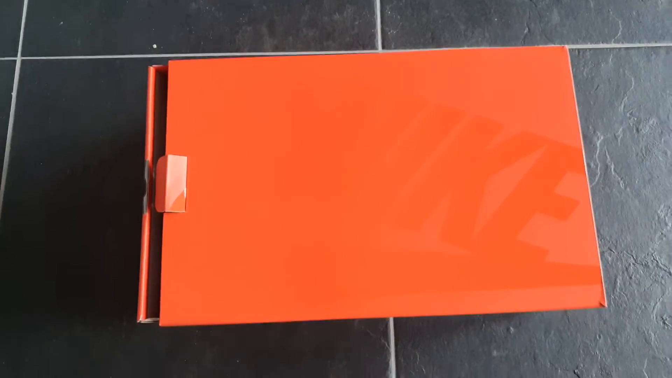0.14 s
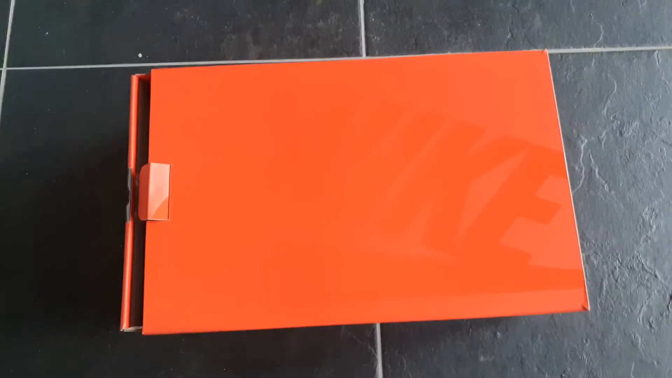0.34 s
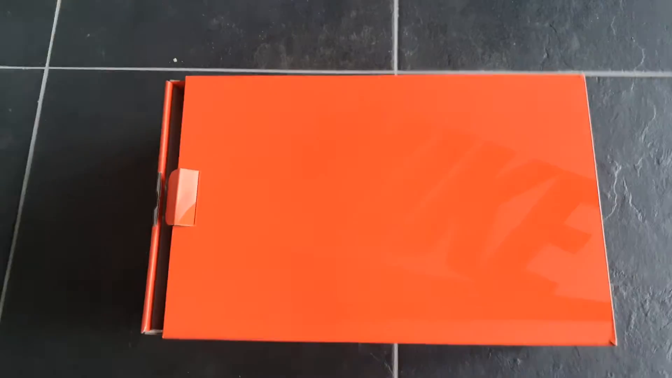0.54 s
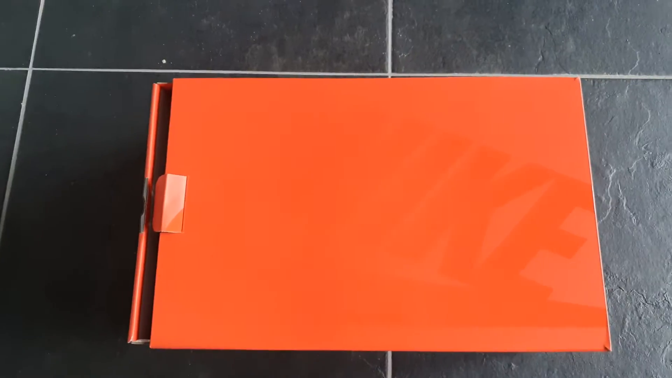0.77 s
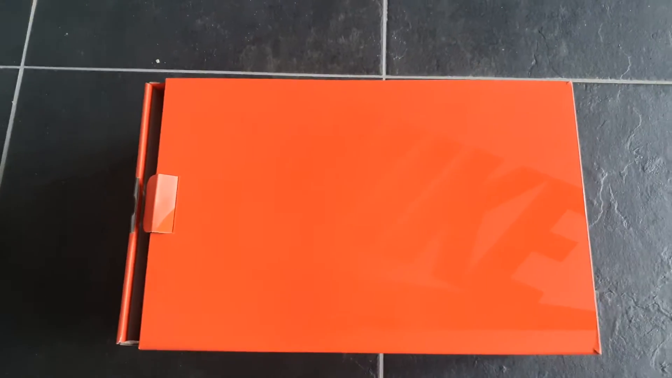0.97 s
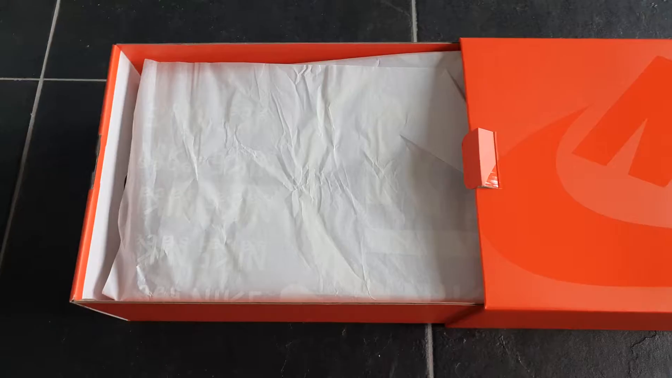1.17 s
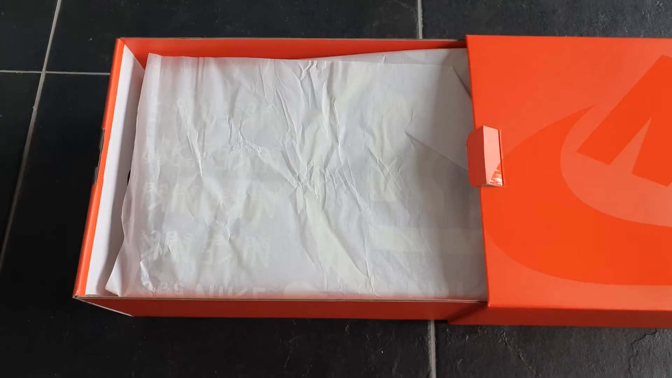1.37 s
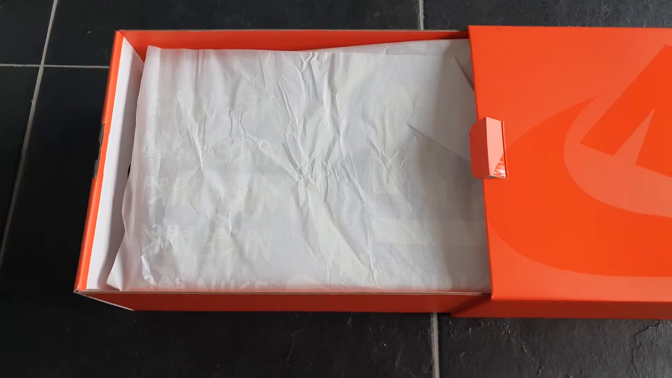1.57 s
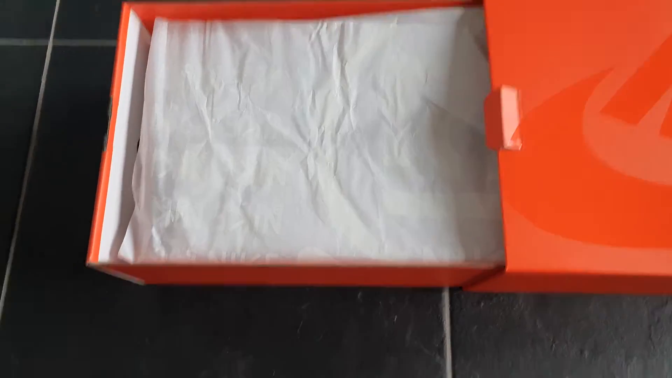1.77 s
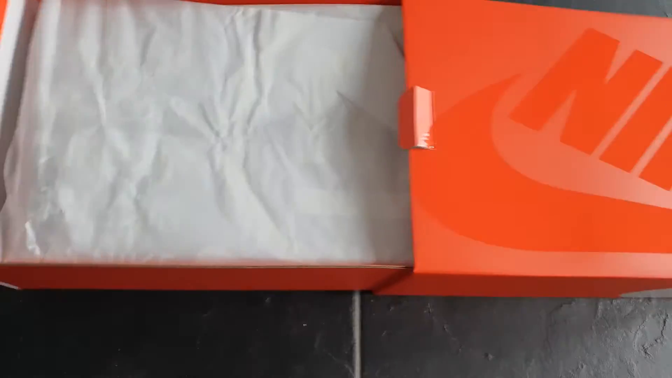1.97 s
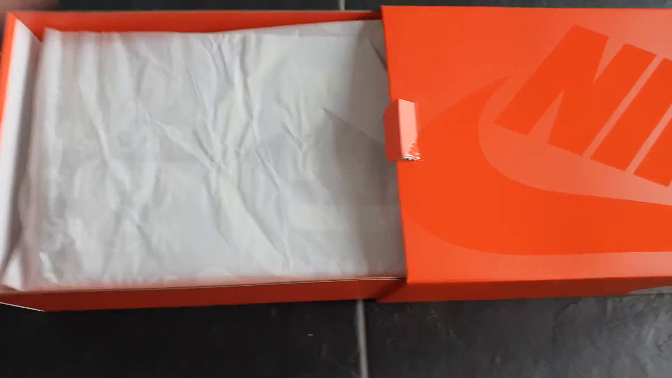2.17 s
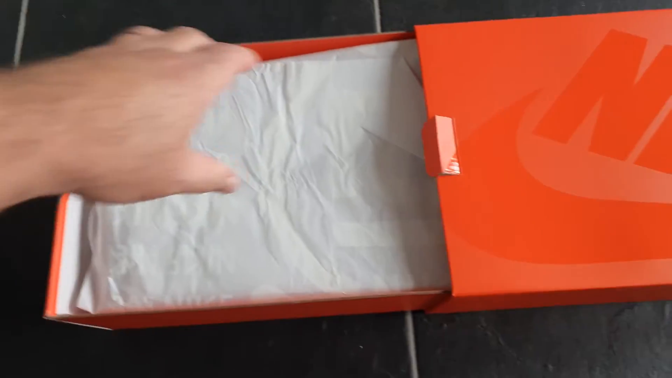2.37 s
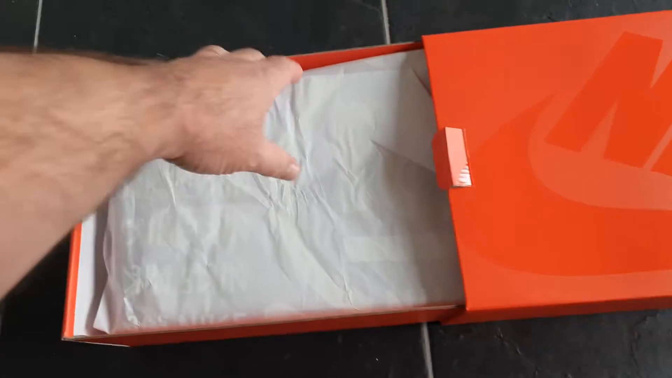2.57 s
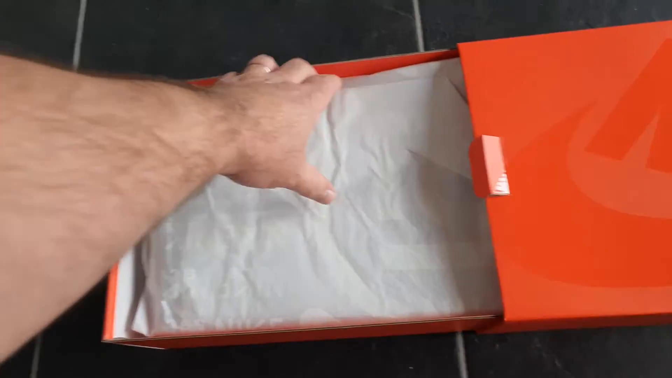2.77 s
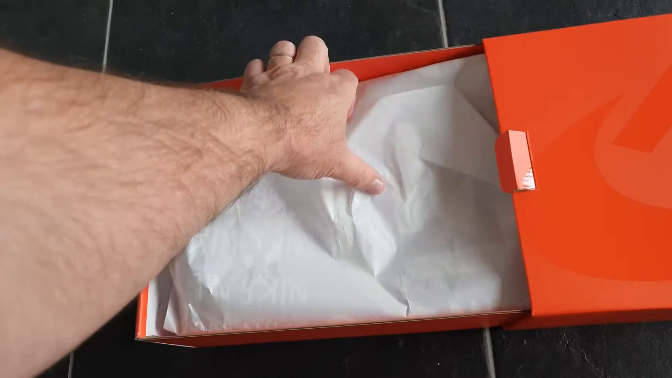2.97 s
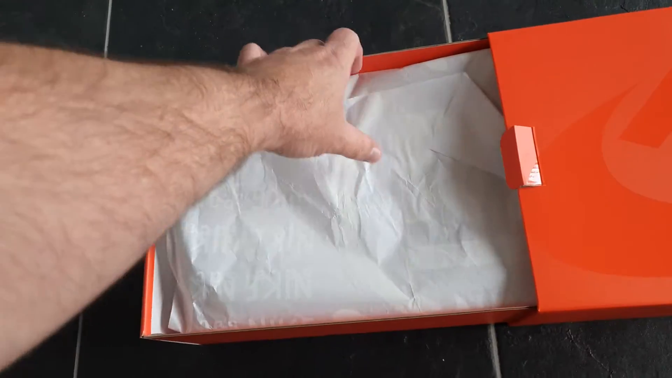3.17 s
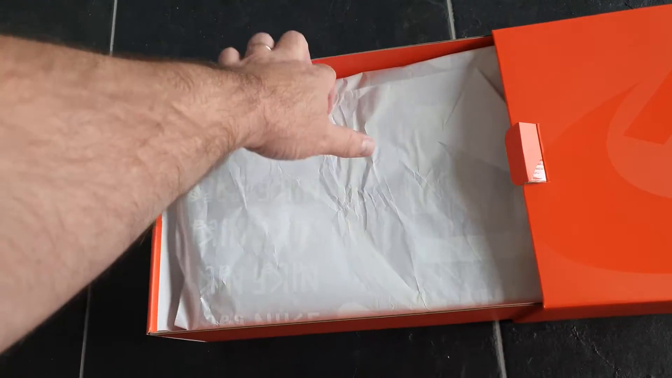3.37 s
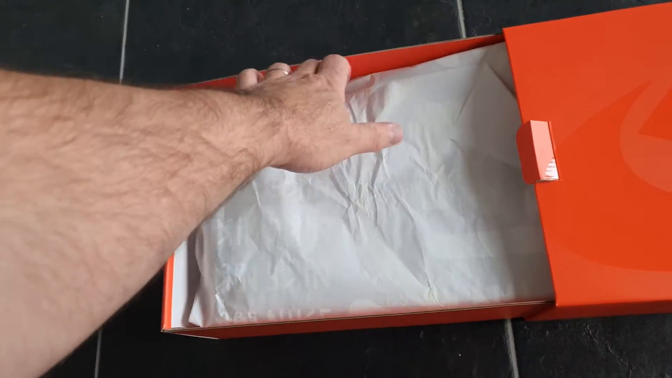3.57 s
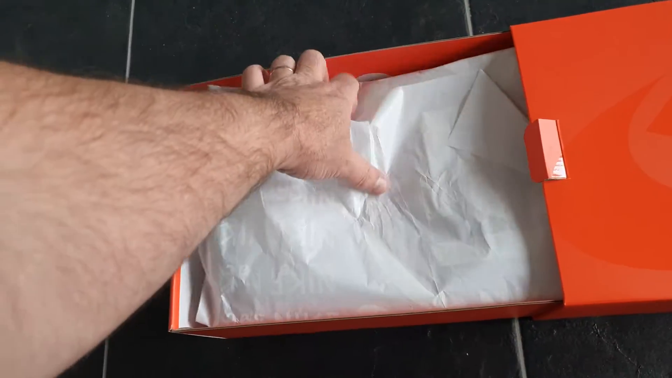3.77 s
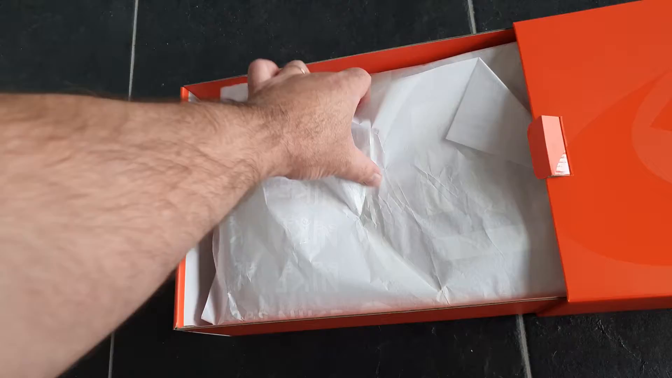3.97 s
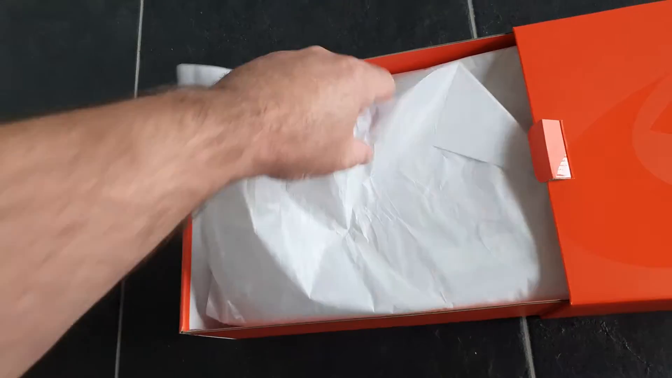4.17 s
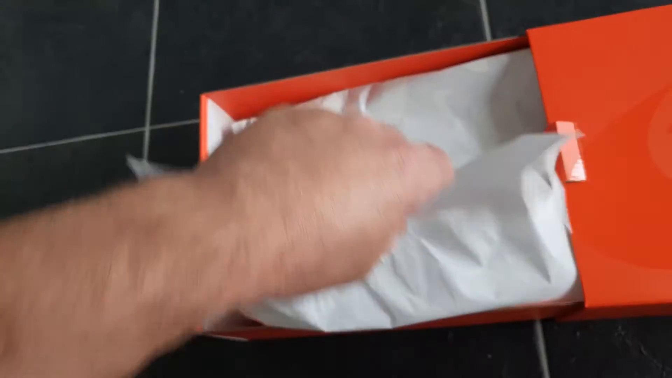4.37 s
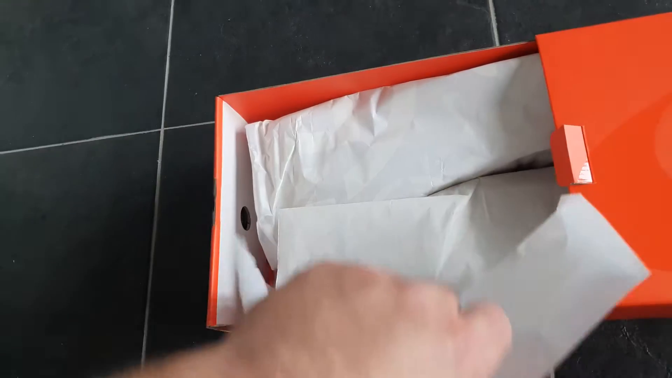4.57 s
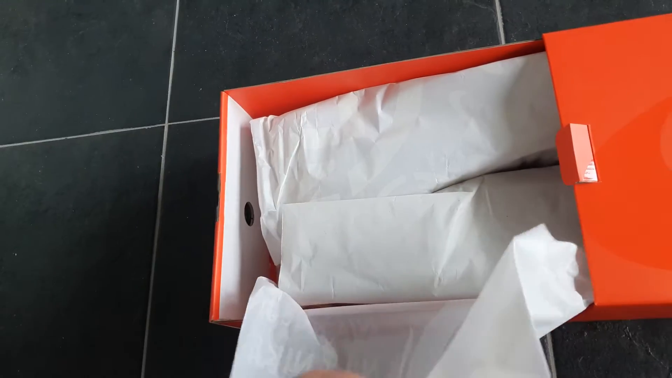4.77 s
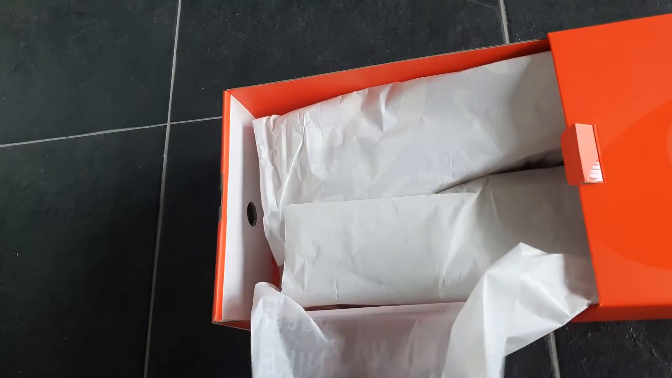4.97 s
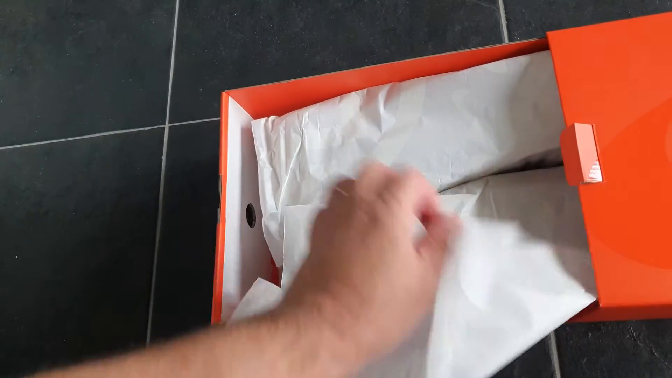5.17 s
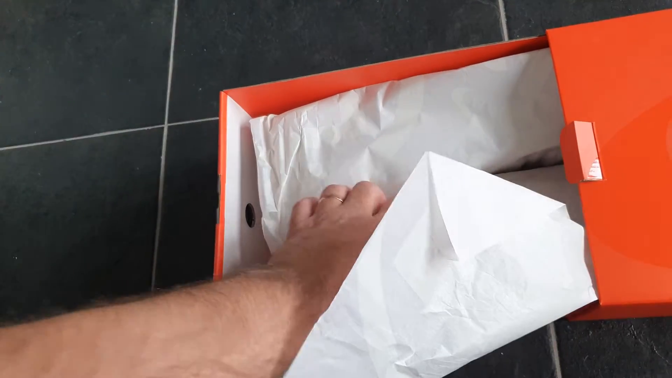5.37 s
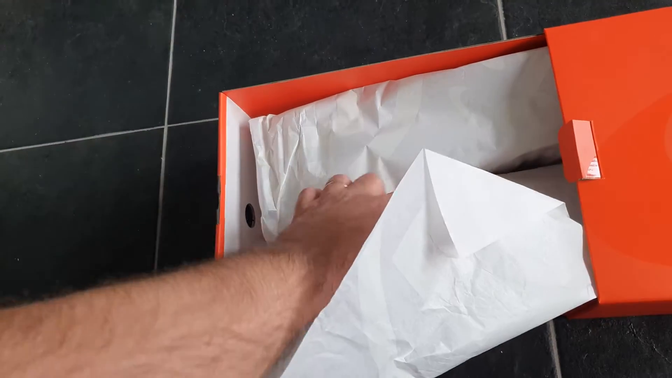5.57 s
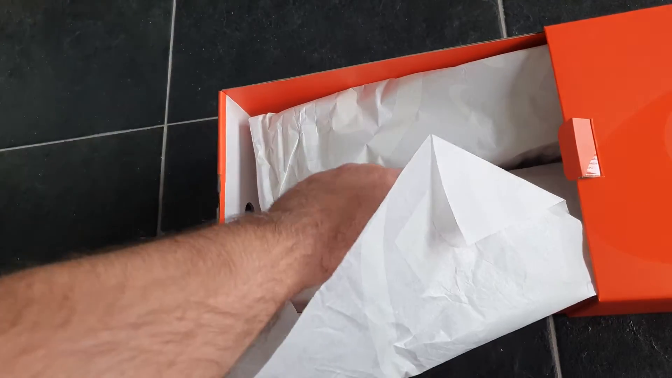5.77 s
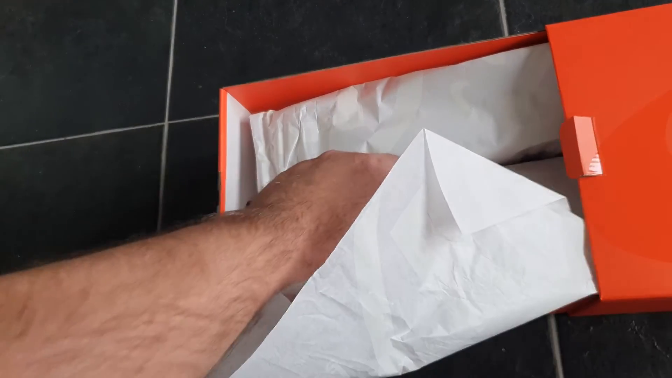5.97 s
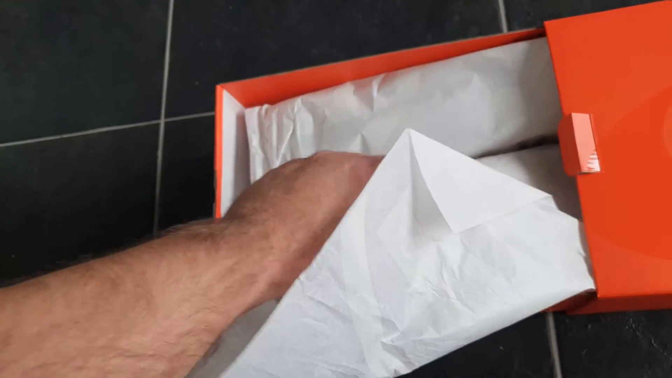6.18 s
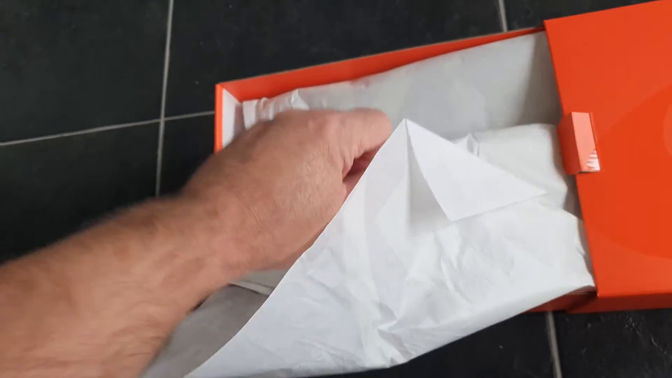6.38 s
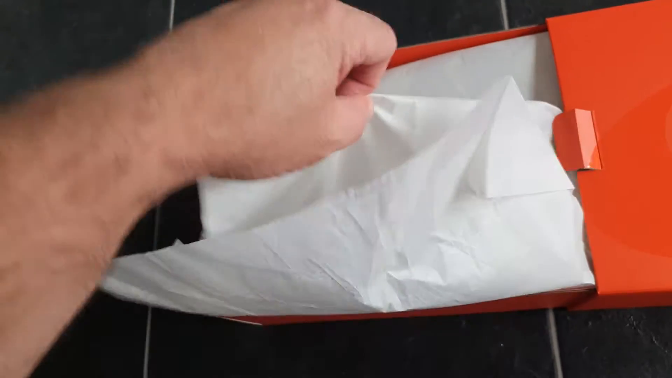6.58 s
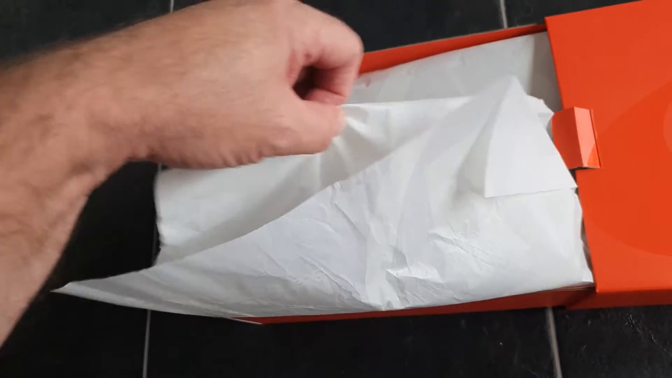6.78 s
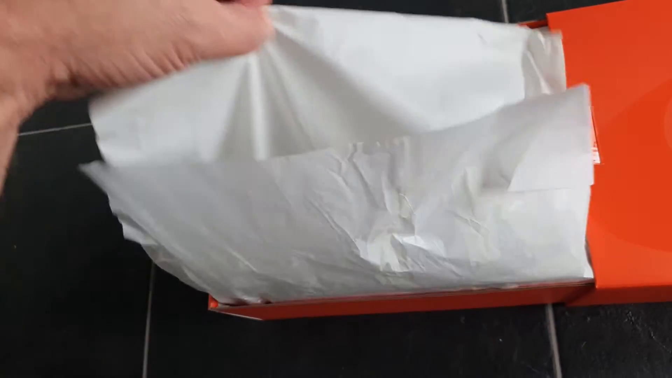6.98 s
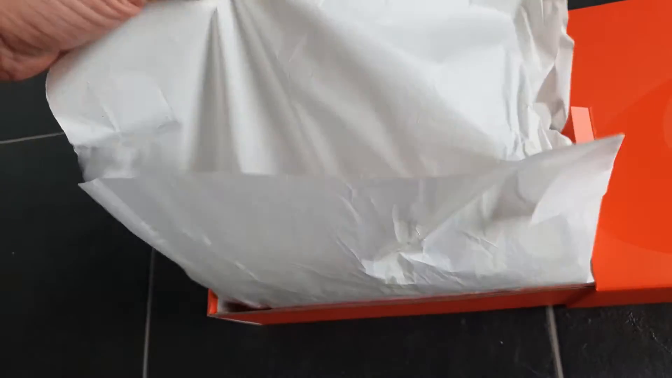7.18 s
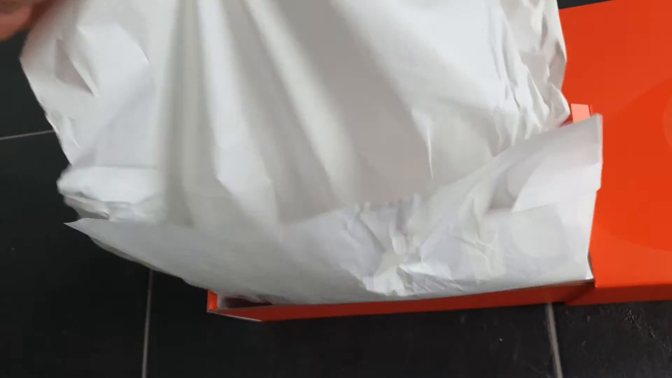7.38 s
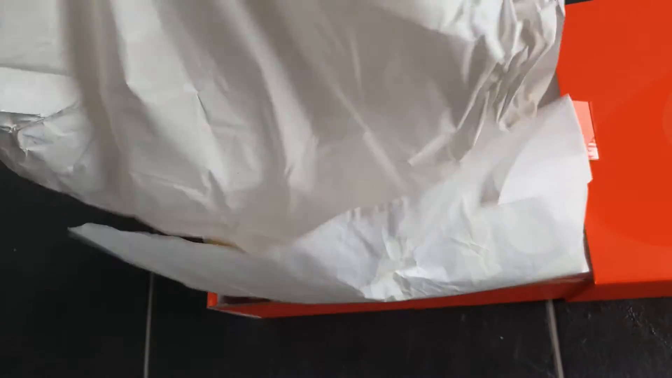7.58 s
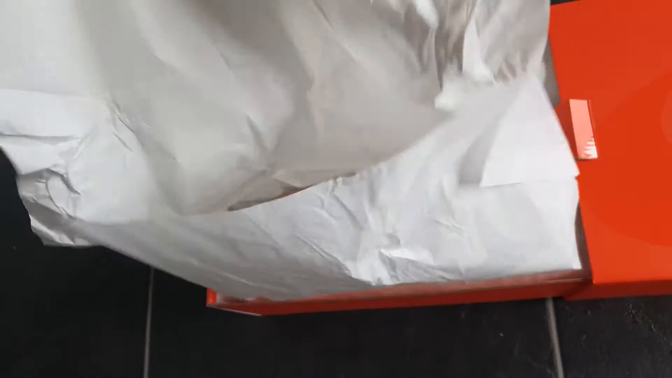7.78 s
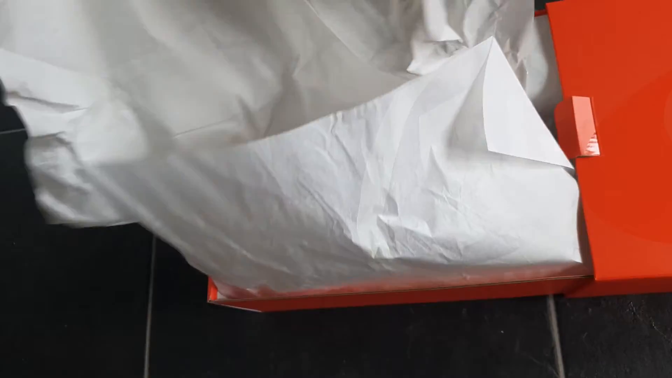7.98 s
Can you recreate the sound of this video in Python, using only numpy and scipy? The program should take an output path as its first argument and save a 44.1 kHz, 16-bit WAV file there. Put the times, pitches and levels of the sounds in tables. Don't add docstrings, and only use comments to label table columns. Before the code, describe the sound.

Close up, light taps and rubs give way to crinkling tissue paper, sharp crease snaps and dull cardboard knocks, hardest near the end.

```python
import sys
import numpy as np
from scipy import signal
from scipy.io import wavfile
from scipy.ndimage import uniform_filter1d

SR = 44100
rng = np.random.default_rng(int(sys.argv[2]) if len(sys.argv) > 2 else 0)


def how_loud(loudness_db):
    steps = np.asarray(loudness_db, float) / 20
    return 10 ** steps


def master(y):
    cut = np.clip(np.atleast_2d(y).T, -1, 1)
    pcm = np.round(cut * 32767)
    wavfile.write(sys.argv[1], SR, pcm.astype(np.int16))


N = 354563
T = np.arange(N) / SR

# [f/Hz, density/dB per Hz]
AIR_SPECTRUM = [(88, -34), (150, -5), (249, -11), (439, 0), (774, -6), (1980, -18), (5460, -37),
                (6770, -4.5), (16000, -60)]
AIR_DB = -82.5
# [f/Hz, t60/s]
ROOM_DECAY = [(200, 0.13), (1000, 0.59), (4000, 0.12), (12000, 0.12)]
# [f/Hz, left-right level/dB]
PORT_SHADE = [(60, -29), (180, 18.5), (550, -0.5), (1650, -4.5), (4970, -0.5), (15000, 0.5)]

# [peak t/s, level/dB, time to rise 10 dB/s, time to fall 10 dB/s]
SLEEVE_SWEEPS = [
    (0.0, -80.5, .1, 1.5),
    (0.58, -69, -0.21, -0.59),
    (1.68, -78, -0.25, 3.5),
    (2.08, -60.5, 0.09, 0.43),
    (2.3, -61.5, 0.06, 0.07),
]
# [f/Hz, density/dB per Hz]
CLOTH_SPECTRUM = [(120, -45), (200, 3), (399, 12), (496, 8), (841, 10.5), (1140, 4), (1900, -1.5),
                  (2840, -14), (3660, -9.5), (8450, -21), (15400, -22)]
SLEEVE_LOW_DB, SLEEVE_END_S = -0.5, 2.75

# [peak t/s, level/dB, time to rise 10 dB/s, time to fall 10 dB/s]
GRIP_JOLTS = [(0.0, -76, .1, 1), (0.51, -42.5, 0.09, 0.04), (0.91, -56, -0.02, -0.1),
              (1.08, -53.5, 0.16, 0.08), (1.36, -65, 0.04, 0.3), (1.78, -49.5, -0.12, 0.35),
              (2.0, -43, 0.05, 0.08), (2.36, -59.5, -0.1, 0.05), (2.76, -54, -0.03, 1.2),
              (2.89, -42.5, -0.03, -0.34), (3.227, -40, 0, 0.2), (3.52, -44.5, 0, 0.7),
              (4.41, -39.5, -0.13, 0.24), (5.43, -41, -0.04, -0.15), (6.6, -30.5, -0.22, 0.1),
              (6.9, -36, -0.34, 0.25), (7.33, -40.5, -0.26, 0.2), (7.63, -27.5, -0.23, 0.13),
              (7.76, -37, 0.14, -0.2)]
# [f/Hz, density/dB per Hz]
SWAY_SPECTRUM = [(15, -28), (25, 2), (59, 1), (97, 0), (124, -6), (220, -8.5), (290, -16), (480, -120)]
# [f/Hz, density/dB per Hz]
WORK_SPECTRUM = [(15, -16), (25, -19.5), (92, -4), (135, -10.5), (220, -10), (290, -64), (480, -120)]
SHAKE_DB, SHAKE_SLOPE, STILL_DB = -45, 0.86, -89

# [start t/s, length/s, peak level/dB, left-right level/dB, swell/dB]
FINGER_SLIPS = [
    (0.414, 0.13, -63.5, -39, 5),
    (0.523, 0.04, -53, 49, 10),
    (0.88, 0.082, -52, -27, 18),
    (0.966, 0.044, -74, -16, 5),
    (1.039, 0.041, -59, 11, 8.5),
    (1.14, 0.053, -68.5, 19, -7),
    (1.727, 0.21, -59, -24, 8),
    (1.909, 0.13, -40.5, -49, 13.5),
]
# [f/Hz, density/dB per Hz]
SKIN_SPECTRUM = [(180, -26), (300, -2), (619, 0.5), (1510, -5), (1660, -3.5), (2310, -12.5), (3490, -11),
                 (5640, -18), (6760, -18.5), (15400, -27)]
SLIP_PEAK = 0.55
SLIP_TREBLE_DB, TREBLE_PER_PAN = -2.5, 0.24
# [t/s, peak level/dB, ring f/Hz, treble level/dB, left-right level/dB]
FINGER_TICKS = [(0.39, -60, 558, -13, -16), (0.4162, -38.5, 2900, -24, -25), (0.4178, -47, 300, -30, -20),
                (0.4878, -29.5, 700, -9, -22.5), (0.51, -24.5, 840, -30, -24), (0.5242, -34, 527, -8.5, 14),
                (0.888, -51, 786, -5, -29.5), (1.037, -34, 3500, -7, 27), (1.141, -45.5, 3000, -13, 21),
                (1.738, -48, 526, -12, -21), (2.0712, -37, 725, -27, -22), (2.088, -39, 791, -14, -21.5),
                (2.105, -40.5, 830, -19, -20), (2.18, -48, 859, -12, -12), (2.271, -42, 890, -16, -6),
                (2.351, -46, 1030, -14, -17), (2.368, -47, 1100, -14, -16), (2.386, -45, 1500, -13, -14),
                (2.411, -48, 1200, -16, -12), (2.437, -47, 1280, -17, -16), (2.454, -49, 775, -20, -18)]

# [f/Hz, level/dB, t60/s]
BOX_MODES = [(193, -3, 0.011), (230, -25, 0.12), (277, 4, 0.19), (341, 2.5, 0.2), (407.4, 3, 0.18),
             (559.5, -3, 0.086), (825, 6, 0.0092)]
# [t/s, ring level/dB, freedom of the walls as a factor on t60, thud level/dB]
BOX_KNOCKS = [(2.884, -29.5, 0.67, -24), (3.2227, -17, 1.16, -10.5), (3.504, -27, 0.56, -34),
              (3.625, -28, 0.56, -21.5), (3.731, -26, 0.85, -30), (4.584, -22, 1.4, -36.5),
              (4.698, -23, 1.4, -33), (4.771, -25.5, 1.1, -28), (4.932, -24, 1.1, -38),
              (5.292, -32, 0.43, -40), (5.409, -16.5, 0.64, -24.5), (6.561, -20, 1, -36),
              (7.617, -14, 0.84, -17), (7.701, -5.5, 0.21, -16), (7.733, -3, 0.82, -11),
              (7.762, -16, 0.98, -41), (7.778, -12, 0.62, -28), (7.839, -24, 1.1, -38),
              (7.926, -30, 0.92, -42)]
PUSH_DB, PUSH_SLOPE, PUSH_S = -39, 0.66, 0.017

# [peak t/s, effort level/dB, time to rise 10 dB/s, time to fall 10 dB/s]
HAND_TUGS = [(2.729, -44, 0.26, 0.35), (2.956, -25.5, 0.0262, 0.03), (3.005, -31, 0.08, 0.23),
             (3.059, -28, 0, 0.09), (3.103, -25.5, 0, 0.03), (3.181, -32, 0.1, -0.07),
             (3.349, -27.0, 0.05, -0.04), (3.514, -28, 0, -0.07), (3.729, -21, 0.0162, 0.04),
             (3.871, -28, 0.08, -0.2), (4.0, -31.5, 0.57, -1.2), (4.05, -30.5, 0.27, 0.021),
             (4.14, -32, 0.16, 0.1), (4.186, -28, 0.08, 0.15), (4.259, -24.0, -0.03, 0.04),
             (4.305, -25.5, -0.02, 0.045), (4.365, -24, -0.02, 0.16), (4.447, -23.5, -0.05, 0.06),
             (4.545, -26, 0.03, 0.023), (4.587, -26, -0.1, 0.1), (4.78, -20.0, 0.0852, 0.07),
             (4.877, -29.5, -0.11, 0.09), (5.005, -24.5, 0.06, 0.07), (5.062, -28, -0.2, -0.07),
             (5.1, -28.0, -0.17, 0.09), (5.196, -32.5, -1.1, 0.2), (5.244, -35.5, -0.02, 0.1),
             (5.304, -31, 0, 0.06), (5.413, -23, -0.03, 0.02), (5.481, -30.0, -0.02, 0.16),
             (5.621, -33, 0.12, 0.2), (5.677, -36, -0.04, 0.164), (5.804, -30, -0.09, 0.07),
             (5.877, -33.5, -0.07, 0), (5.912, -31, -0.02, -0.17), (6.062, -26.5, 0.03, 0.02),
             (6.127, -32.0, 0.22, 0.4), (6.29, -23, 0.0248, 0.07), (6.416, -25, 0.17, 0.076),
             (6.574, -18, 0.1147, 0.18), (6.894, -23, 0, 0.49), (7.22, -23, 0.08, 0.043),
             (7.381, -27, -0.12, 0.08), (7.563, -23.5, 0.1, 0.07), (7.622, -22, 0.01, 0.1),
             (7.724, -24, 0.17, 0.09), (8.016, -35, 0.14, 3)]
FULL_DB = -20
# [t/s, grain (1 crumpling, 0 one sheet sliding free)]
PAPER_GRAIN = [
    (2.64, 0.89),
    (4.6, 0.64),
    (6.2, 0.9),
    (6.4, 0.32),
    (7.3, 0.35),
    (7.5, 0.24),
    (8.04, 0.64),
]
PAPER_START_S = PAPER_GRAIN[0][0]
# [f/Hz, density/dB per Hz]
PAPER_SPECTRUM = [(290, -56.5), (500, 0.5), (647, -4), (1150, -1.5), (1670, 0.5), (2010, -0.5), (3230, 2),
                  (6900, -7.5), (7960, -14.5), (10500, -11.5), (15400, -17)]
SHEEN_DB, SHEEN_SLOPE = -29, 1.226

# [t/s, peak level/dB, ring f/Hz, treble level/dB]
CREASE_CRACKS = [(2.6847, -36, 1180, -19), (2.7382, -30, 1100, -8), (2.8745, -17, 4600, -18),
                 (2.9025, -13, 3730, -12.5), (3.0632, -10.5, 3780, -9), (3.5254, -22, 3930, -5),
                 (3.8104, -3, 3540, -24), (3.8582, -5.5, 3170, -11), (3.976, -20, 2420, -9),
                 (4.299, -14.5, 2340, -21), (4.311, -12.5, 1440, -14), (5.0516, -12.5, 4500, -10),
                 (5.301, -15, 3860, -22), (5.32, -23, 3050, -25), (5.394, -14, 1860, -18),
                 (5.5634, -22, 1220, -25), (5.6136, -21, 1860, -12), (5.691, -17, 4470, -12.5),
                 (6.072, -9, 3090, -24), (6.2923, -14, 2050, -10)]
# [t/s, peak level/dB, ring f/Hz, treble level/dB]
CREASE_SNAPS = [(2.7798, -23.5, 3250, -19), (3.0548, -19.5, 3740, -9.5), (3.0856, -10, 4850, -20),
                (3.1088, -6.5, 3180, -14.5), (3.396, -17, 2800, -17), (3.5004, -27, 1162, -12),
                (3.546, -9.5, 2240, -20), (3.616, -28, 1690, -9.5), (3.7422, -10.5, 3830, -11),
                (4.1003, -17, 3980, -25.5), (4.137, -8, 3800, -16.5), (4.175, -11, 2800, -35),
                (4.445, -17, 1160, -15), (4.513, -20, 6060, -10), (4.5304, -11, 3170, -20),
                (4.587, -8.5, 1900, -17), (4.773, -8, 1710, -14), (4.871, -10, 1840, -20),
                (4.9606, -9.5, 4190, -17), (4.994, -12.5, 1750, -11), (5.3815, -16, 1700, -16),
                (5.4145, -12, 3800, -17), (5.8, -13.5, 1670, -26.5), (5.8736, -18, 1230, -21.5),
                (6.129, -17, 3440, -17.5), (6.263, -10, 4430, -15), (7.2157, -19.5, 1360, -22),
                (7.923, -22.5, 3450, -15)]
# [t/s, peak level/dB, ring f/Hz, treble level/dB]
FOLD_CRUNCHES = [(3.318, -24, 3430, -11), (3.7143, -11, 2340, -22), (3.9523, -17, 1670, -28),
                 (4.2492, -12, 1700, -23), (4.361, -11.5, 4600, -16), (4.67, -16, 1730, -13),
                 (4.7395, -9.5, 1720, -13.5), (5.0987, -16, 3980, -15), (5.481, -23.5, 2020, -24),
                 (5.6536, -25, 3430, -14), (6.0427, -16, 3380, -25), (6.3876, -15, 1580, -25),
                 (7.376, -19.5, 1170, -7), (7.618, -9.5, 3400, -24), (7.65, -13, 3300, -26),
                 (7.74, -13, 3270, -21.5), (7.765, -20, 3270, -22)]
# [t/s, peak level/dB, ring f/Hz, treble level/dB]
PLEAT_FLIPS = [(2.7097, -44, 1210, -25), (2.7312, -29, 1100, -22), (2.94, -21, 1700, -24),
               (2.954, -21, 4420, -24), (2.9952, -25, 1190, -22), (3.0226, -20.5, 3150, -13),
               (3.3622, -15.5, 1640, -23), (3.4914, -31, 2060, -19), (3.5099, -24, 993, -17),
               (3.5164, -15, 1170, -24), (3.5584, -23, 2490, -15), (3.6436, -32, 930, -24),
               (3.7317, -14, 1210, -23), (3.8697, -24, 3170, -28), (3.8897, -23, 3210, -11),
               (3.9943, -17, 2500, -15), (4.044, -18, 1230, -22), (4.0582, -20, 3270, -30),
               (4.1124, -16.5, 3770, -17), (4.1902, -15, 3110, -17), (4.2258, -19, 1210, -17),
               (4.341, -17, 947, -15), (4.369, -20, 1390, -8), (4.3996, -15.5, 1610, -13),
               (4.4138, -15, 3400, -17), (4.4863, -19, 1000, -10), (4.576, -18, 1860, -13),
               (4.6974, -16, 1760, -13), (4.797, -23, 1870, -19), (4.8122, -21, 1700, -21),
               (4.9332, -15, 2200, -18), (5.066, -17.5, 4080, -15), (5.238, -13, 4000, -23),
               (5.2755, -20, 3770, -25), (5.7435, -23.5, 1410, -17), (5.784, -26, 1640, -24),
               (5.841, -25, 1660, -16), (5.9044, -26, 1220, -19), (6.181, -17, 3330, -24),
               (6.2015, -20.5, 2880, -16), (6.223, -27.5, 1360, -21), (6.9002, -19, 1190, -13),
               (7.3834, -20, 1120, -23), (7.4402, -18, 1360, -13), (7.695, -20, 3240, -8),
               (7.7274, -13.5, 3240, -14), (7.7854, -32, 1220, -9), (7.8444, -29, 1020, -9),
               (8.01, -21, 3230, -22), (8.0324, -17.5, 3050, -14)]
CRACK_MS, SNAP_MS, CRUNCH_MS, PLEAT_MS = 0.76, 2.77, 7, 2.33


def evened(x):
    return x / np.sqrt(np.mean(x ** 2) + 1e-20)


def read(points, hz):
    f, value = np.transpose(points)
    return np.interp(np.log(hz + 1), np.log(f + 1), value)


def colour(x, points):
    gain_db = read(points, abs(np.fft.fftfreq(8192, 1 / SR)))
    log_gain = np.log(how_loud(np.maximum(gain_db, -100)))
    taps = np.fft.ifft(np.exp(np.conj(signal.hilbert(log_gain)))).real[:4096]
    return signal.oaconvolve(x, taps[None], axes=1)[:, :N]


def split(x, hz):
    low = signal.sosfilt(signal.butter(4, hz, "low", fs=SR, output="sos"), x)
    high = signal.sosfilt(signal.butter(4, hz, "high", fs=SR, output="sos"), x)
    return low, high


def flutter(seconds):
    size = max(int(seconds * SR), 2)
    return evened(uniform_filter1d(uniform_filter1d(rng.standard_normal(N), size), size))


def swells(rows, floor_db):
    s, db, rise, fall = np.transpose(rows)[:, :, None]
    t = T[::64]
    before = (s - t) / np.maximum(rise, .012)
    after = (t - s) / np.maximum(fall, .02)
    drop = np.where(t < s, before, after)
    power = (how_loud(db - 10 * drop) ** 2).sum(0) + how_loud(floor_db) ** 2
    return np.interp(T, t, 10 * np.log10(power))


def panned(pan_db):
    sides = how_loud(np.multiply.outer([.5, -.5], np.clip(pan_db, -30, 30)))
    return 2 * sides / sides.sum(0)


def add(mix, s, sound):
    part = mix[:, round(s * SR):][:, :sound.shape[1]]
    part += sound[:, :part.shape[1]]


def quiet_air():
    return how_loud(AIR_DB) * evened(colour(rng.standard_normal((2, N)), AIR_SPECTRUM))


def room(x):
    taps = np.zeros((2, SR // 2))
    slots = np.arange(160, SR // 2 - 20, 20)
    at = slots + rng.integers(0, 20, (2, len(slots)))
    np.put_along_axis(taps, at, rng.choice([-1., 1.], at.shape), 1)
    hz, t, z = signal.stft(taps, SR, nperseg=256)
    decay = how_loud(-60 * t / read(ROOM_DECAY, hz)[:, None])
    tail = signal.istft(z * decay, SR, nperseg=256)[1]
    return signal.fftconvolve(x, tail / np.linalg.norm(tail[0]), axes=1)[:, :N]


def shaded(x):
    low, high = split(x, 1010)
    both = high + 0.44 * low.mean(0) + 0.52 * low
    left = colour(both[:1], [(hz, db / 2) for hz, db in PORT_SHADE])
    right = colour(both[1:], [(hz, -db / 2) for hz, db in PORT_SHADE])
    return np.vstack([left, right])


def sleeve():
    fade = np.clip((SLEEVE_END_S - T) / 0.018, 0, 1)
    fibres = rng.standard_normal((2, N)) * how_loud(0.27 * flutter(0.0083))
    low, high = split(colour(fibres, CLOTH_SPECTRUM), 2510)
    cloth = how_loud(10.5) * evened(high) + how_loud(SLEEVE_LOW_DB) * evened(low)
    return fade * how_loud(swells(SLEEVE_SWEEPS, floor_db=-100)) * cloth


def grip(effort_db):
    noise = rng.standard_normal((3, N)) * how_loud(2.6 * flutter(.02))
    lumps = noise[2] + .36 * noise[:2]
    work = np.clip(T - 1.9, 0, 1)
    rumble = work * evened(colour(lumps, WORK_SPECTRUM))
    rumble += (1 - work) * evened(colour(lumps, SWAY_SPECTRUM))
    pulling = np.clip((T - PAPER_START_S) / .1, 0, 1)
    shake = how_loud(SHAKE_DB + SHAKE_SLOPE * (effort_db - FULL_DB)) * pulling
    return np.hypot(how_loud(swells(GRIP_JOLTS, STILL_DB)), shake) * rumble * how_loud([[-.8], [.8]])


def slips():
    drag = rng.standard_normal((2, N)) * how_loud(2.0 * flutter(0.0006))
    body, treble = split(colour(drag, SKIN_SPECTRUM), 3450)
    body, treble = evened(body), evened(treble)
    out = np.zeros((2, N))
    for start, length, peak_db, pan_db, swell_db in FINGER_SLIPS:
        from_peak = np.interp((T - start) / length, [0, SLIP_PEAK, 1], [1, 0, 1])
        level_db = peak_db - swell_db * from_peak
        onset, release = (T - start) / 0.0011, (start + length - T) / 0.006 + .6
        on = np.clip(np.minimum(onset, release), 0, 1)
        bright = how_loud(SLIP_TREBLE_DB + TREBLE_PER_PAN * pan_db)
        out += on * how_loud(level_db + 1.5) * panned(pan_db)[:, None] * (body + bright * treble)
    return out


def ticks(cycles=0.86, lag=3.5, crack=0.49):
    out, t = np.zeros((2, N)), np.arange(600) / SR
    for s, peak_db, hz, treble_db, pan_db in FINGER_TICKS:
        noise = rng.standard_normal((3, len(t)))
        ring = np.sin(2 * np.pi * hz * t) * np.exp(-t * hz / cycles)
        ring += crack * uniform_filter1d(noise[2], 9) * np.exp(-t / 0.0022)
        hiss = evened(np.diff(noise[:2], 2, prepend=0, append=0))
        puff = 0.79 * how_loud(treble_db) * hiss * np.exp(-t / 0.001)
        sound = how_loud(peak_db + 1.5) * panned(pan_db)[:, None] * (ring + puff)
        sound[0] = np.roll(sound[0], round(lag * rng.uniform(-0.63, 1)))
        add(out, s, sound)
    return out


def box(push, held):
    t = np.arange(SR // 2) / SR
    ring = np.zeros(len(t))
    for k, (hz, db, t60) in enumerate(BOX_MODES):
        ring += (-1) ** k * how_loud(db - 60 * t / (held * t60)) * np.sin(2 * np.pi * hz * t)
    return split(signal.oaconvolve(push, ring)[:N], 124)[1]


def shaken(push):
    t = np.arange(SR // 3) / SR
    rattle = how_loud(-36.0) * rng.standard_normal(len(t)) * np.exp(-t / 0.094)
    return np.convolve(push, rattle + (t == 0))


def knocks():
    out, push = np.zeros((1, N)), signal.windows.hann(30)
    t = np.arange(SR // 20) / SR
    thud = np.sin(2 * np.pi * 215 * t) * np.exp(-t / 0.0034)
    thud += 0.4 * np.sin(2 * np.pi * 950 * t) * np.exp(-t / 0.0034)
    for s, peak_db, freedom, thud_db in BOX_KNOCKS:
        add(out, s, how_loud(peak_db - 36.0) * box(shaken(push), np.clip(freedom, .2, 2))[None])
        add(out, s + 0.00196, how_loud(thud_db) * thud[None])
    return out[0]


def tiny_creases():
    size = how_loud(3.2 * np.minimum(rng.exponential(1, N), 4.5))
    size *= rng.random(N) < 1800 / SR
    place, t = rng.integers(0, 16, N), np.arange(300) / SR
    creases = np.zeros((2, N))
    for k, hz in enumerate(np.geomspace(800, 9000, 16)):
        shape = rng.standard_normal((3, len(t)))
        shape += 0.76 * np.sin(2 * np.pi * (hz * t + rng.random((3, 1))))
        shape *= np.exp(-t / 0.00093)
        heard = panned(rng.normal(0, 4.9))[:, None] * (.5 * shape[2] + 0.91 * shape[:2])
        creases += signal.oaconvolve((size * (place == k))[None], heard, axes=1)[:, :N]
    return creases


def paper(effort_db):
    on = np.clip((T - PAPER_START_S) / 0.088, 0, 1)
    grain = np.clip(np.interp(T, *np.transpose(PAPER_GRAIN)), 0, 1)
    clump = how_loud(grain * (1.9 * flutter(.004) + .6 * flutter(.018)))
    creases = tiny_creases()
    slide = np.sqrt(1.4 - grain ** 2) * rng.standard_normal((2, N))
    sheet = colour(clump * (grain * evened(creases) + slide), PAPER_SPECTRUM)
    body, treble = split(sheet, 6470)

    lows = [0 * body] + [split(body, hz)[0] for hz in (1400, 2400, 4200)] + [body]
    folds = np.diff(lows, axis=0)
    body = sum(fold * how_loud(grain * 2.43 * flutter(0.0097)) for fold in folds)
    sheen_db = SHEEN_DB + SHEEN_SLOPE * (effort_db - FULL_DB)
    crackle = how_loud(effort_db - 1.0) * evened(body) + how_loud(sheen_db) * evened(treble)

    lazy_db = uniform_filter1d(effort_db, int(PUSH_S * SR) + 1) - FULL_DB
    push = how_loud(PUSH_DB + PUSH_SLOPE * lazy_db) * on * clump * evened(creases.mean(0))
    return on * crackle, how_loud(-22.5) * box(push, held=0.27)


def snaps():
    out, t = np.zeros((2, N)), np.arange(2400) / SR
    kinds = [(CREASE_CRACKS, CRACK_MS, 1.6), (CREASE_SNAPS, SNAP_MS, .3),
             (FOLD_CRUNCHES, CRUNCH_MS, .3), (PLEAT_FLIPS, PLEAT_MS, .3)]
    for creases, run_ms, first in kinds:
        run = np.clip(run_ms, .6, 14) / 1000
        shape = (1 - np.exp(-t / (0.24 * run))) * np.exp(-t / run)
        shape += first * np.exp(-t / 0.00074)
        for s, peak_db, hz, treble_db in creases:
            unevenness = 6.54 * uniform_filter1d(rng.standard_normal(len(t)), 25)
            breaks = rng.standard_normal((5, len(t))) * how_loud(4.1 * unevenness) * shape
            r = np.exp(-np.pi * (400 + 0.5 * hz) / SR)
            poles = [1, -2 * r * np.cos(2 * np.pi * hz / SR), r * r]
            tone = signal.lfilter([1, -1], poles, 0.41 * breaks[4] + breaks[:2])
            broad = uniform_filter1d(np.diff(breaks[2:4], prepend=0), 5, axis=1)
            body = tone / abs(tone).max() + .4 * broad / abs(broad).max()
            bright = split(breaks[2:4] * np.minimum(t / (0.61 * run), 1), 7400)[1]
            sound = split(body, 6830)[0] + 4.1 * how_loud(treble_db) * bright / abs(bright).max()
            add(out, s, how_loud(peak_db + 2.0) * panned(rng.normal(0, 0.68))[:, None] * sound)
    return out


def scene():
    effort_db = swells(HAND_TUGS, floor_db=-82)
    crackle, hum = paper(effort_db)
    near = crackle + snaps()
    hollow = (hum + knocks()) * how_loud([[-.4], [.4]])
    reflected = room(how_loud(-14.0) * near + how_loud(-11.0) * hollow)
    hand = slips() + ticks() + grip(effort_db)
    return shaded(near + reflected) + hollow + hand + sleeve() + quiet_air()


def top_cut(x):
    return signal.sosfilt(signal.butter(12, 16990, fs=SR, output="sos"), x)


def record(dry):
    limited = split(1.399 * np.tanh(dry / 1.245), 45.5)[1]
    edge = signal.firwin(401, 15950, window=("kaiser", 7), fs=SR)
    return top_cut(signal.oaconvolve(limited, edge[None], "same"))


dry = scene()
out = record(dry)
master(out)
```